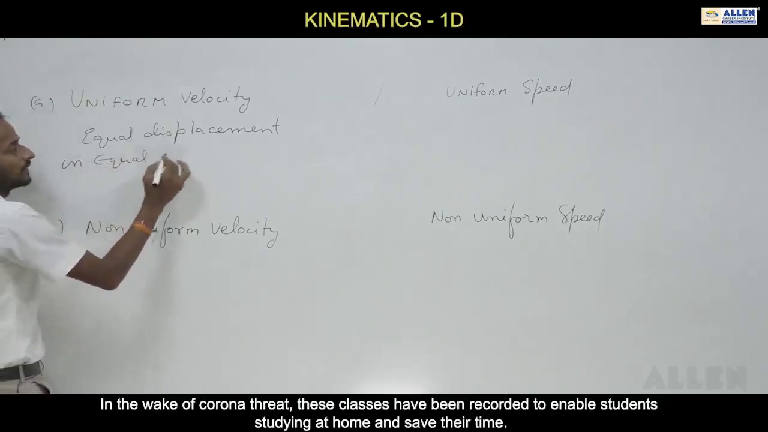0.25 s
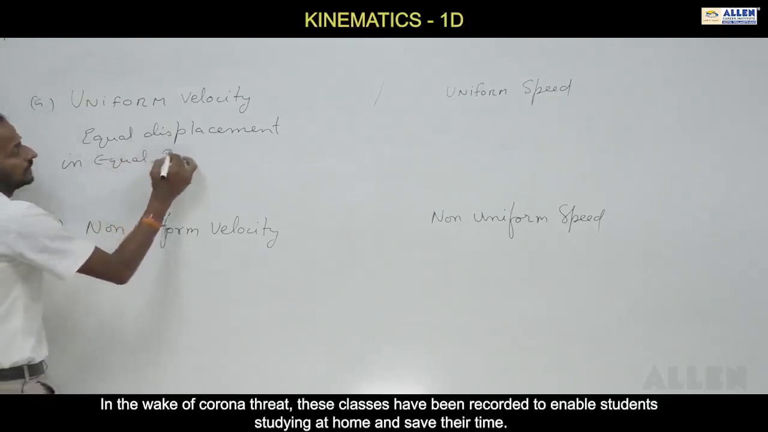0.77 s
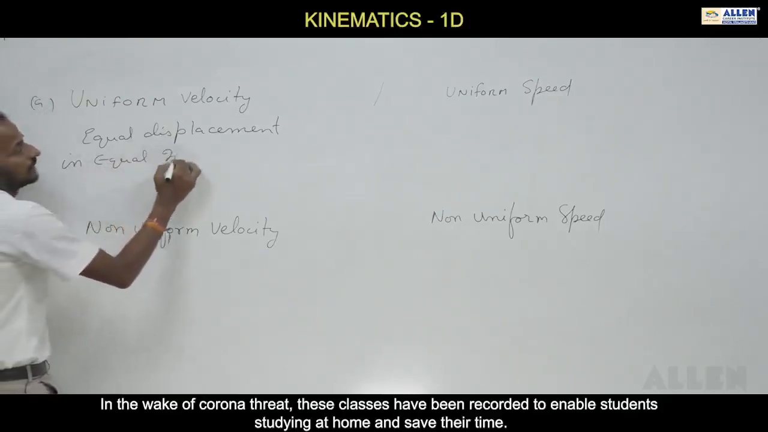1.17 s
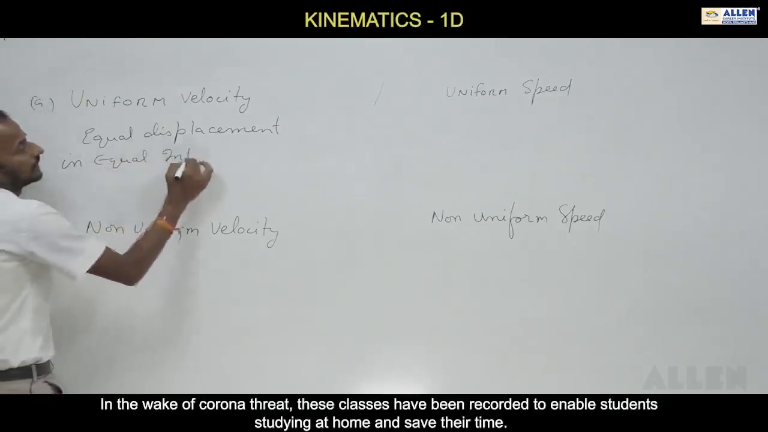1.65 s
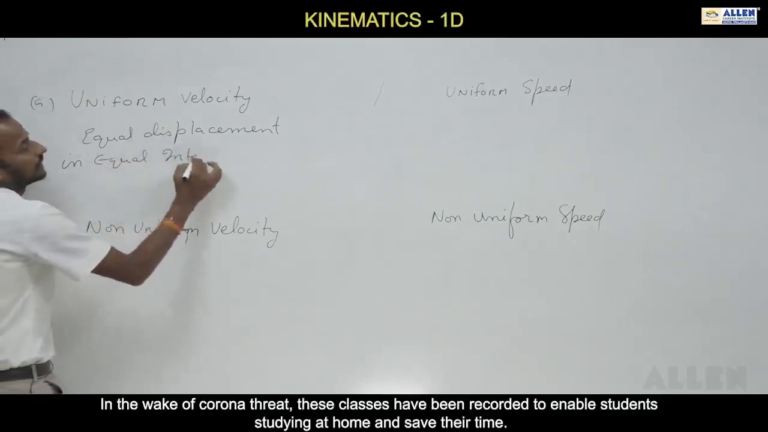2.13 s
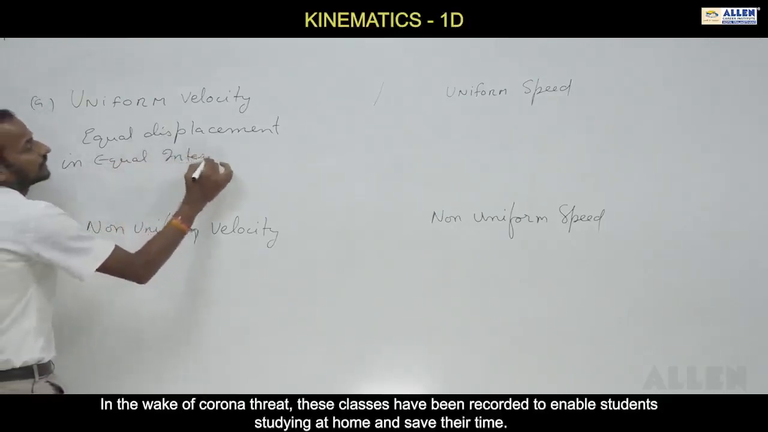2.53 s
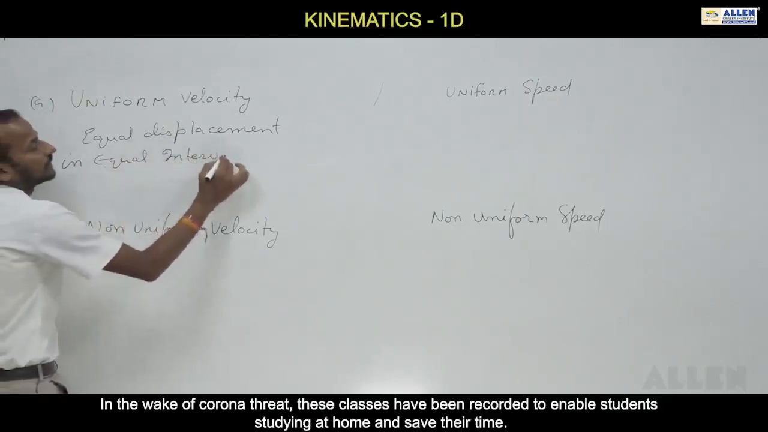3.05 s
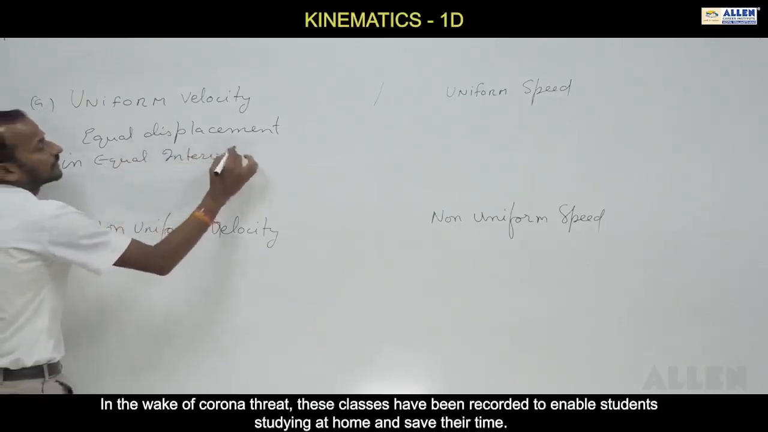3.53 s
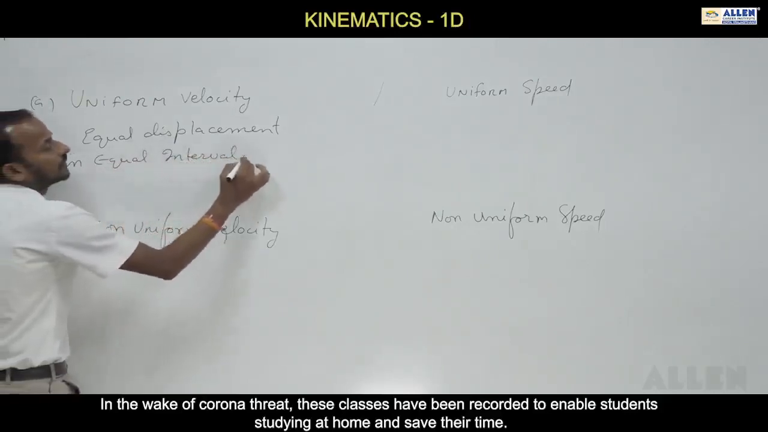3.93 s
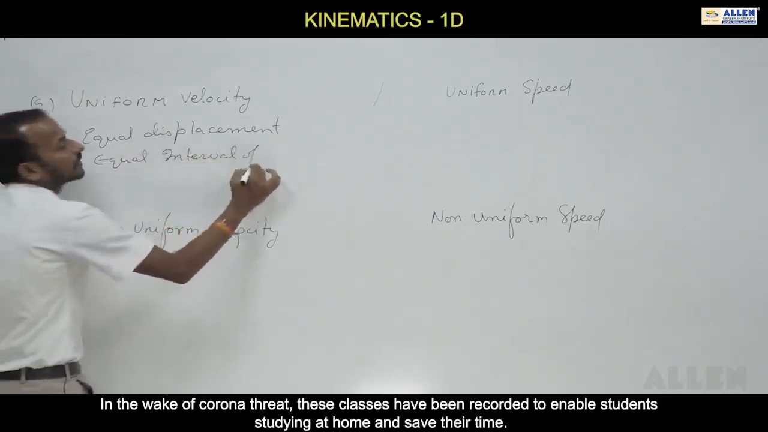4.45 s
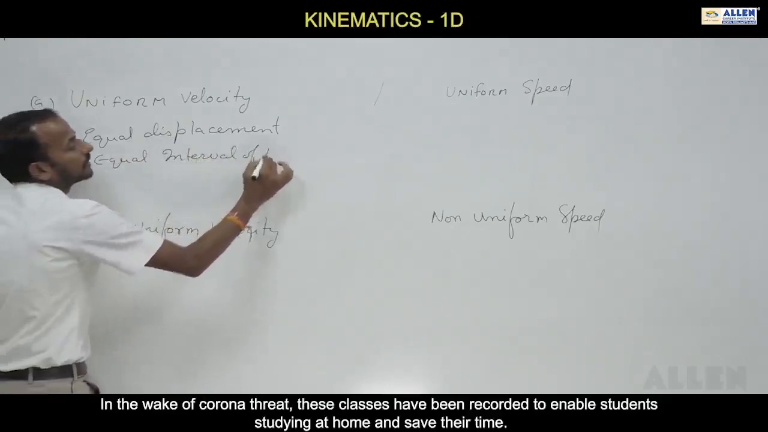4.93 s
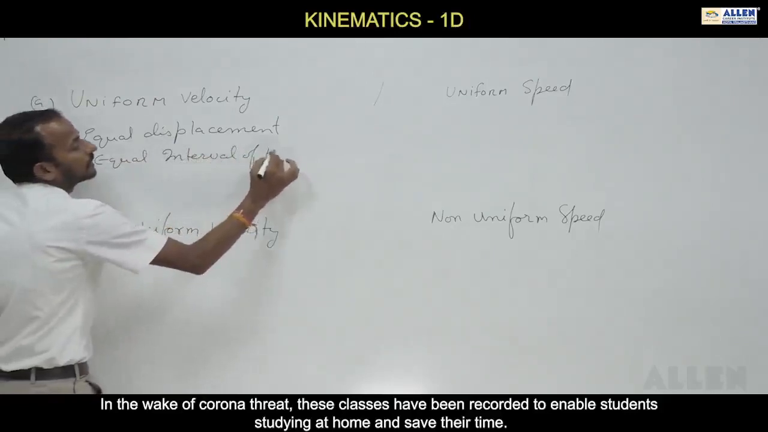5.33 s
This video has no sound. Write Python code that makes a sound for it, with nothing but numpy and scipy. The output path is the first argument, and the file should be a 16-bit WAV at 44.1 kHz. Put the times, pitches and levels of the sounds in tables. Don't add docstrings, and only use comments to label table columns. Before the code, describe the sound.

A felt marker writes on a whiteboard in a quiet, hard-walled classroom. Low ventilation rumble, a faint wavering fan hum and microphone hiss run throughout, slightly subdued at first and swelling back over the first two seconds. A weak board resonance from an earlier touch fades at the start. A soft, dull tap lands at 0.6 s, followed by very faint, airy felt strokes from 0.8 to 1.5 s. Clearer hollow knocks come at 1.6 and 1.9 s, with short dry hisses until nearly 3 s. Another tap falls at 3.1 s, then a longer rub around 3.5 s. Firmer, louder thuds hit at 3.9 and 4.8 s, with brighter strokes between, strongest near 4.4 s. A lighter tap at 5.0 s and two fairly firm ones at 5.4 and 5.6 s finish it. Each tap has a low, woody panel ring, slight pen rattle and short room tail.

```python
import sys
import numpy as np
from scipy import signal
from scipy.fft import rfft, irfft, next_fast_len
from scipy.io import wavfile
from scipy.ndimage import uniform_filter1d, map_coordinates

SR = 44100
rng = np.random.default_rng(int(sys.argv[2]) if len(sys.argv) > 2 else 0)


def field_ratio(decibels):
    return 10 ** (np.asarray(decibels, dtype=float) / 20)


def master_out(mix):
    frames = np.transpose(np.atleast_2d(mix))
    ceiling = np.clip(frames, -1, 1)
    pcm = np.round(ceiling * 32767).astype(np.int16)
    wavfile.write(sys.argv[1], SR, pcm)


N = 246386

# (time [s], peak level [dB], firmness [0-1], upper share [ratio])
LANDINGS = [
    (.6205, -28.5, .45, 1.1),
    (1.6305, -18.3, .49, 1),
    (1.9357, -21.5, .47, .9),
    (3.1323, -21, .59, 0),
    (3.8933, -14.8, .75, -.37),
    (4.7944, -14.2, .79, -.48),
    (5.0413, -18.2, .48, -.4),
    (5.4049, -16, .64, -.48),
    (5.5689, -18.3, .72, -.4),
]
# (barrel level [dB], tip edge level [dB])
RATTLE = [(-53, -61), (-48, -53), (-48, -56), (-60.5, -62), (-43.5, -46.5), (-40, -45.5), (-57, -62),
          (-50, -52), (-45.5, -66)]


def unit(x):
    return x / np.sqrt(np.mean(x ** 2) + 1e-20)


def along(points, hz):
    f, value = np.transpose(points)
    return np.interp(np.log(hz + 1), np.log(f + 1), value)


def wobble(rate):
    knots = rng.standard_normal(int(N * rate / SR) + 4)
    return map_coordinates(knots, [np.arange(N) * rate / SR])


def filtered(x, response):
    m = next_fast_len(N + SR // 2)
    return irfft(rfft(x, m) * response(np.fft.rfftfreq(m, 1 / SR)), m)[:N]


def resonance(f, hz, width):
    return 1j * f * width / (hz * hz - f * f + 1j * f * width)


def body(x, modes):
    def response(f):
        return sum((-1) ** k * field_ratio(db) * resonance(f, hz, width) for k, (hz, width, db) in enumerate(modes))

    return unit(filtered(x, response))


def ring(modes, scatter_db):
    t = np.arange(SR) / SR
    chance = rng.standard_normal(len(modes))
    total = np.zeros(SR)
    for c, (hz, db, t60, rise) in zip(chance, modes):
        envelope = field_ratio(db + scatter_db * c - 60 * t / t60) * (1 - np.exp(-t / rise)) ** 2
        total -= envelope * np.sin(2 * np.pi * hz * t)
    return total


def patchy(x, depth_db):
    z = signal.stft(x, nperseg=512)[2]
    field = uniform_filter1d(rng.standard_normal(z.shape), size=6, axis=0)
    field = uniform_filter1d(field, size=10, axis=1)
    return unit(signal.istft(z * field_ratio(depth_db * unit(field)), nperseg=512)[1][:N])


def gain_recovery_db():
    dip_db, hold_s, recovers_s = -6, 0.45, 0.59
    t = np.arange(N) / SR
    return dip_db * np.exp(-np.maximum(t - hold_s, 0) / recovers_s)


def microphone_hiss(gain_db):
    # (frequency [Hz], density [dB per Hz])
    hiss_spectrum = [(410, -39), (700, -14), (1190, -5), (1300, -4.5), (1500, -7.5), (3200, -12.5),
                     (11000, -15.5), (11900, -19.5), (15500, -51), (22000, -120)]
    hiss = unit(filtered(rng.standard_normal(N), lambda f: field_ratio(along(hiss_spectrum, f))))
    return field_ratio(-69.5 + gain_db + 1.15 * wobble(3.0)) * hiss


def ventilation(gain_db):
    # (frequency [Hz], density [dB per Hz])
    rumble_spectrum = [(12, -72), (20, -31), (42, -9), (70, -6.5), (102, -7.5), (124, -5.5), (151, -4.5),
                       (290, -5), (517, -12.5), (677, -23.5), (1500, -36), (1950, -44), (3300, -120)]
    # (time [s], level [dB])
    vent_points = [(0, -48), (.3, -53), (.8, -51), (1.2, -54.5), (1.8, -49), (2.5, -51.5), (3.4, -49.5),
                   (4.5, -52), (5.59, -50.5)]
    rumble = unit(filtered(rng.standard_normal(N), lambda f: field_ratio(along(rumble_spectrum, f))))
    vent_db = np.interp(np.arange(N) / SR, *np.transpose(vent_points))
    return field_ratio(vent_db + gain_db + 0.54 * wobble(6.37)) * rumble


def fan_hum(gain_db):
    hum_db, fades_db = -53, 2.2
    sympathy_db, sympathy_rise_s, sympathy_t60_s = -24, 0.059, 0.47
    phase = 2 * np.pi * np.cumsum(99.5 + 3 * wobble(20)) / SR
    hum = field_ratio(2.2 * wobble(22)) * np.sin(phase)
    level = field_ratio(hum_db + 0.55 * gain_db + fades_db * wobble(5.31))
    for s, peak_db, _, _ in LANDINGS:
        since = np.maximum(np.arange(N) / SR - s, 0)
        swell = (1 - np.exp(-since / sympathy_rise_s)) ** 2
        level += field_ratio(peak_db + sympathy_db - 60 * since / sympathy_t60_s) * swell
    return level * hum


def fading():
    start_db, t60_s = -60, 0.09
    decay = field_ratio(start_db - 60 * np.arange(N) / SR / t60_s)
    return decay * body(rng.standard_normal(N), [(500, 1300, 0)])


def lingering_modes():
    # (frequency [Hz], level [dB], t60 [s], rise [s])
    linger_modes = [(173.3, -50.5, 0.92, 0.00078), (298, -50.5, 0.3, 0.00039), (183, -56, 0.74, 0.00091),
                    (158.4, -51.5, 1.3, 0.00087), (625, -65, .3, .001)]
    return np.pad(ring(linger_modes, 0), (0, N - SR)) * field_ratio(2.5 * wobble(30))


def strokes():
    # (start [s], length [s], felt level [dB], hiss centre [Hz], barrel against hiss [dB])
    stroke_table = [(0.036, 0.076, -72, 8660, -23), (0.777, 0.11, -71.5, 8900, -14),
                    (0.91, 0.1, -69, 8500, -7), (1.046, 0.14, -73, 8530, -12), (1.28, 0.09, -74, 8500, -14),
                    (1.39, 0.11, -73, 8450, -12), (1.672, 0.12, -69.5, 8800, -4),
                    (1.97, 0.11, -69, 8950, -6), (2.11, 0.095, -66.5, 9250, -10),
                    (2.21, .1, -68.5, 9150, -6), (2.562, .11, -68.5, 9150, -11),
                    (2.74, 0.21, -69.5, 8600, -4), (3.202, .07, -66.5, 9300, -5),
                    (3.29, .07, -69, 9350, -6), (3.473, 0.28, -69.5, 9200, -6),
                    (4.005, 0.2, -72.5, 9200, -0.5), (4.207, 0.096, -67, 9050, -3),
                    (4.354, 0.15, -63, 9900, -11), (4.52, 0.12, -67.5, 9900, -4.5),
                    (4.837, 0.073, -67.5, 10000, -7), (5.054, 0.07, -67.5, 9800, -0.5),
                    (5.175, 0.067, -71, 9400, 1.5), (5.27, .1, -83, 9000, -7)]
    # (frequency [Hz], width [Hz], level [dB])
    pen_modes = [(4300, 200, -4), (5900, 250, -5), (8000, 350, 0), (9330, 400, -3), (10700, 400, -2)]
    speed_up_s, slow_down_s = 0.041, 0.078
    felt_top_hz = 11100
    start, length, hiss_db, centre_hz, barrel_db = np.transpose(stroke_table)[:, :, None]

    coarse = np.arange(0, N + 64, 64)
    t = coarse / SR - start
    ramp = np.minimum(.5 + t / speed_up_s, .5 + (length - t) / slow_down_s)
    speed = np.sin(np.pi / 2 * np.clip(ramp, 0, 1)) ** 2
    level = field_ratio(hiss_db - 5) * speed

    def mix(part):
        return np.interp(np.arange(N), coarse, (part * level).sum(0))

    grain_db = 4.4 * rng.standard_normal(N) + 1.9 * wobble(40)
    slips = patchy(rng.standard_normal(N) * field_ratio(grain_db), depth_db=3.0)

    def hiss_band(hz):
        return unit(filtered(slips, lambda f: resonance(f, hz, 4600) ** 2 / (1 + (f / felt_top_hz) ** 24)))

    share = np.clip((centre_hz - 7800) / 2600, 0, 1)
    felt = mix(np.sqrt(1 - share)) * hiss_band(8000) + mix(np.sqrt(share)) * hiss_band(10200)
    felt += field_ratio(-5.5) * mix(length / .15) * body(slips, [(5000, 2600, 0)])
    felt += field_ratio(-25.0) * mix(1) * body(slips, pen_modes)
    return felt + mix(field_ratio(barrel_db)) * body(rng.standard_normal(N), [(2545, 350, 0)])


def board_thud():
    # (frequency [Hz], level [dB], t60 [s], rise [s])
    patch_modes = [(355, 0, .06, .001)]
    span_modes = [(274, 11, .048, .01), (258, -1.5, .076, .0032)]
    upper_modes = [(472, 12, .037, .012), (590, -14, .03, .001)]
    span_share, span_knee, span_loss = 1.1, .57, 1.9
    out = np.zeros(N + SR)
    for s, peak_db, firm, upper in LANDINGS:
        span = span_share - span_loss * max(firm - span_knee, 0)
        thud = firm * ring(patch_modes, 0) - span * ring(span_modes, 0) + upper * ring(upper_modes, 0)
        out[round(s * SR):][:SR] += field_ratio(peak_db) * thud
    return out[:N]


def tip_rattle():
    # (frequency [Hz], width [Hz], level [dB])
    click_modes = [(603, 174, 3), (794, 134, 6), (996, 216, -2.5), (1160, 88, -1.5)]
    edge_modes = [(1290, 285, 3.5), (1670, 660, -3.5), (2580, 89, -9), (3930, 1400, -29)]
    click, edge = np.zeros((2, N + SR))
    t = np.arange(SR) / SR
    contact = (1 - np.exp(-t / .0008)) ** 2
    for (s, _, _, _), (click_db, edge_db) in zip(LANDINGS, RATTLE):
        at = slice(round(s * SR), round(s * SR) + SR)
        click[at] += field_ratio(click_db + 8.5) * contact * (field_ratio(-60 * t / 0.023) + field_ratio(-7.5 - 60 * t / 0.16))
        edge[at] += field_ratio(edge_db + 1.5) * contact * (field_ratio(-60 * t / 0.032) + field_ratio(-8.0 - 60 * t / 0.21))
    rattle = click[:N] * body(rng.standard_normal(N), click_modes)
    rattle += edge[:N] * body(rng.standard_normal(N), edge_modes)
    return filtered(rattle, lambda f: 1 / (1 + (f / 4000) ** 4))


def panel_ring():
    # (frequency [Hz], level [dB], t60 [s], rise [s])
    panel_modes = [(269.24, -3.5, 0.28, 0.032), (284.4, -15.5, 0.56, 0.07), (337.7, -22, 0.28, 0.0076),
                   (380.7, -19.5, 0.35, 0.012), (456, -24, 0.37, 0.0026), (501, -25, 0.25, 0.019),
                   (544, -21, 0.3, 0.0079), (617, -31.5, 0.34, 0.0023), (670.5, -34.5, 0.31, .006)]
    flex_modes = [(32.4, 1, 0.14, 0.0033), (74.7, -6, 1, 0.024), (99.2, -13, 0.76, 0.015),
                  (117, 4.5, 0.055, 0.0016), (204, -4.5, 0.61, 0.012)]
    rings_on = [1.5, 2.5, -1.5, -1.5, -0.5, .5, -1.5, 1, 1]
    panel_db, flex_db = -3.5, -20.5
    out = np.zeros(N + SR)
    for (s, peak_db, _, _), rings_db in zip(LANDINGS, rings_on):
        plate = field_ratio(panel_db + rings_db) * ring(panel_modes, 4.1) + field_ratio(flex_db) * ring(flex_modes, 2.9)
        out[round(s * SR):][:SR] += field_ratio(peak_db) * plate
    return out[:N]


def barrel():
    # (frequency [Hz], level [dB], t60 [s], rise [s])
    barrel_modes = [(1415, -5, .04, 0.00094), (2487, -10.5, 0.073, .0008), (3880, -15, 0.046, .0008),
                    (4600, -17, .05, .0008)]
    out = np.zeros(N + SR)
    for (s, _, _, upper), (_, edge_db) in zip(LANDINGS, RATTLE):
        out[round(s * SR):][:SR] += max(upper, .3) * field_ratio(edge_db) * ring(barrel_modes, 2.3)
    return out[:N]


def room(x):
    # (frequency [Hz], t60 [s])
    decay_times = [(100, 0.2), (300, 1.33), (700, 0.94), (2000, 0.93), (8000, 0.44)]
    hz, t, z = signal.stft(rng.standard_normal(SR), SR, nperseg=256)
    decay = field_ratio(-60 * t / along(decay_times, hz)[:, None])
    tail = signal.istft(z * decay, SR, nperseg=256)[1][:SR]
    tail = tail * np.clip((np.arange(SR) / SR - .014) / .025, 0, 1)
    return signal.fftconvolve(x, tail / np.linalg.norm(tail))[:N]


def scene():
    gain_db = gain_recovery_db()
    background = microphone_hiss(gain_db) + ventilation(gain_db) + fan_hum(gain_db)
    earlier = fading() + lingering_modes()
    pen = strokes()
    thud = board_thud() + tip_rattle()
    direct = thud + panel_ring() + pen + barrel()
    reverberant = field_ratio(-14.5) * room(thud + pen)
    return (direct + reverberant + earlier + background)[None]


def band_limit(x):
    return signal.sosfilt(signal.butter(12, 12080, fs=SR, output="sos"), x)


def record(dry):
    rolled = filtered(dry[0], lambda f: field_ratio(-30 * np.clip((f - 11450) / 900, 0, 4) ** 2))
    return band_limit(rolled[None])


dry = scene()
out = record(dry)
master_out(out)
```